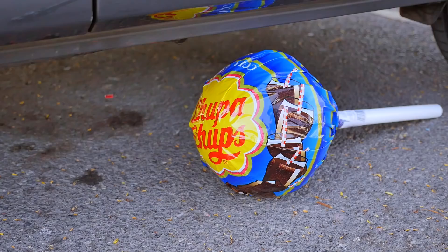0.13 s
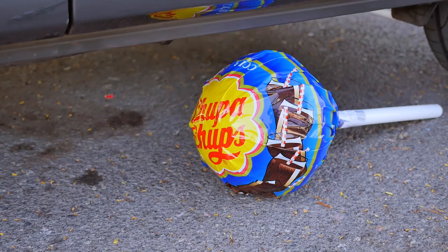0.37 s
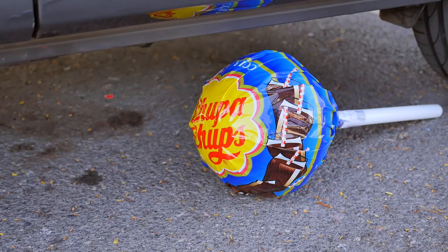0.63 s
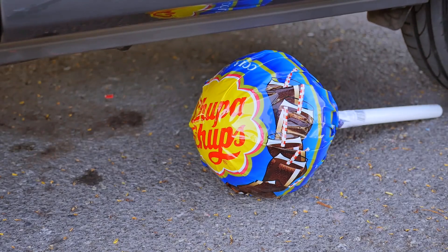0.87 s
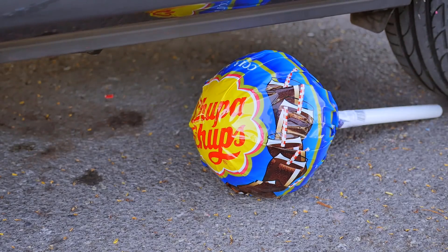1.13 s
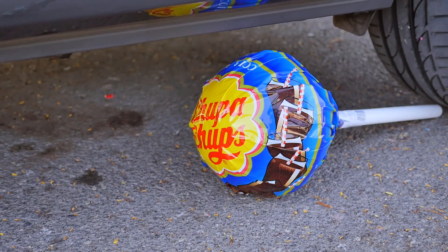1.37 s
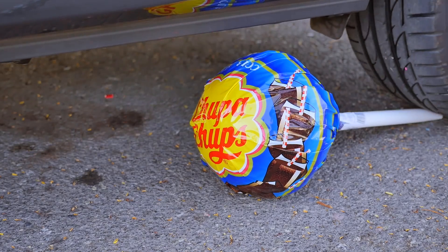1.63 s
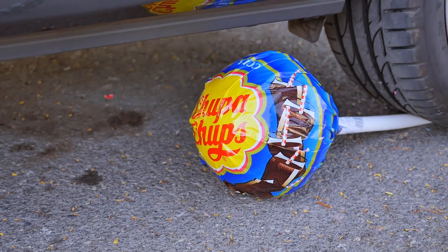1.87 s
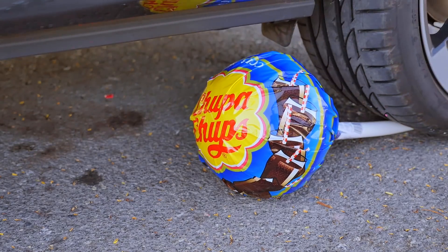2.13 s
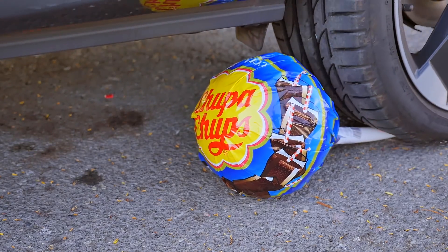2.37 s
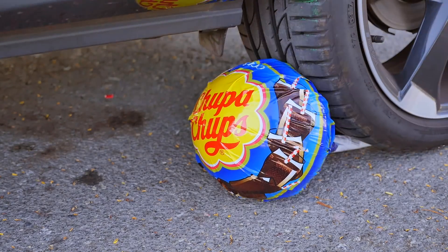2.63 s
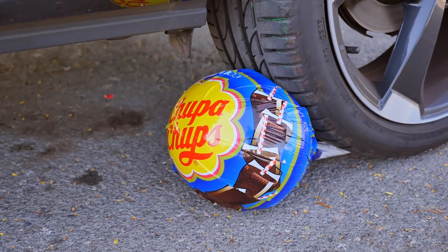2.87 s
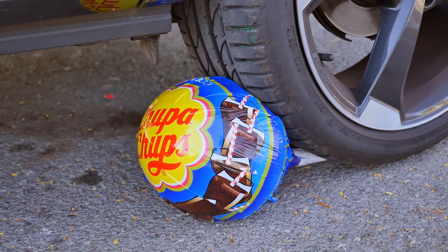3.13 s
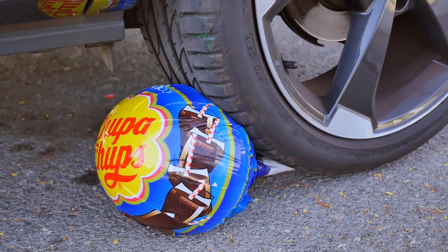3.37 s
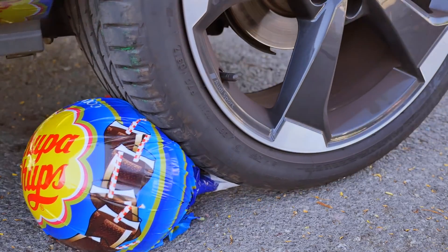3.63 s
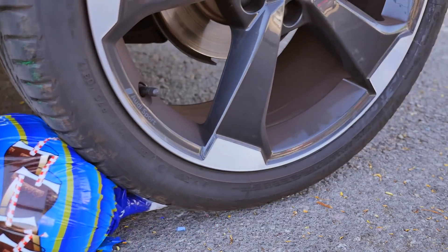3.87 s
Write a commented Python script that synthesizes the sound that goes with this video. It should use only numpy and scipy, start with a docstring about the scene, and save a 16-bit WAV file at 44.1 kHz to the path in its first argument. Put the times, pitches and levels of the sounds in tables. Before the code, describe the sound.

Wrapped plastic shell crackling under a car wheel on a road, heard very close and dry outdoors; a quiet engine idle leads, then rustling film, gritty scraping, hollow knocks and two very loud snaps.

```python
"""A big hollow plastic ball in a film wrapper is pinned to the road by a car's tyre, heard close by, outdoors.
The shell cracks in noise bursts, thuds in single pushes and scrapes as grit knocks on its resonances.
The wrapper crinkles and ticks in short puffs of noise. Behind it the car idles: noise, ringing cavities
and a high tick at each firing, after a brief opening of quiet street noise. The microphone overloads."""
import sys
import numpy as np
from scipy import signal
from scipy.fft import rfft, irfft
from scipy.io import wavfile

SR = 44100
rng = np.random.default_rng(int(sys.argv[2]) if len(sys.argv) > 2 else 0)


def boost_factor(decibels):
    """Convert a level in decibels to a linear amplitude factor."""
    exponent = np.asarray(decibels, float) / 20
    return 10 ** exponent


def pcm_store(signal):
    """Save signal as 16-bit PCM."""
    levels = np.round(np.clip(np.atleast_2d(signal), -1, 1) * 32767)
    wavfile.write(sys.argv[1], SR, levels.astype(np.int16).T)


N = 176400  # samples, 4 s


def evened(x):
    """Scales to rms 1."""
    return x / np.sqrt(np.mean(x ** 2) + 1e-20)


def curve(rows, col=1):
    """Reads a column of a time table at every sample."""
    rows = np.array(rows)
    return np.interp(np.arange(N) / SR, rows[:, 0], rows[:, col])


def after_start(rows):
    """Is true once the first time in a table has passed."""
    return np.arange(N) > rows[0][0] * SR


def colour(x, points):
    """Filters x by a spectrum drawn on a log-frequency axis."""
    f, db = np.transpose(points)
    hz = np.fft.rfftfreq(len(x), 1 / SR)
    gain_db = np.interp(np.log(hz + 1), np.log(f + 1), db)
    return irfft(rfft(x) * boost_factor(gain_db), len(x))


def resonate(x, hz, width):
    """A resonance of gain about 1 at its centre; width in Hz."""
    r = np.exp(-np.pi * width / SR)
    return 2 * signal.lfilter([1 - r], [1, -r * np.exp(2j * np.pi * hz / SR)], x).real


def ring(x, hz, t60):
    """A resonance that dies by 60 dB in t60 seconds."""
    return resonate(x, hz, np.log(1000) / np.pi / t60)


def band(x, lo_hz, hi_hz):
    """Causal band-pass."""
    return signal.sosfilt(signal.butter(2, [lo_hz, min(hi_hz, 20000)], "bandpass", fs=SR, output="sos"), x)


def highpass(x, order, hz):
    """Second-order sections of a high-pass are run both ways, so peaks keep their time."""
    return signal.sosfiltfilt(signal.butter(order, hz, "highpass", fs=SR, output="sos"), x)


def clicks(per_s, spread_db):
    """Random impulses of either sign, a few of them large."""
    size = boost_factor(spread_db * np.minimum(rng.exponential(1, N), 5)) * rng.choice([-1., 1.], N)
    return size * (rng.random(N) < per_s / SR)


def add(mix, s, sound):
    """Mixes a sound in at time s."""
    part = mix[round(s * SR):][:len(sound)]
    part += sound[:len(part)]


# Cracks of the shell. Each row: start in seconds, peak of the snap in dB, then treble and body in dB above
# the snap, burst length in seconds, ring of the wall in dB above the snap, centre of the snap in Hz.
CRACK_EVENTS = [(2.827, -21, -11, -2.5, 0.0006, -27, 2570), (3.251, -20, -13, -6, 0.0011, -17, 2200),
                (3.3982, 5, 0.5, -9.5, 0.0014, -16, 2690), (3.4324, -12, 0, -43, 0.0037, -5, 2870),
                (3.531, -22.5, -14.5, -12, 0.0014, 0, 2800), (3.548, -24.5, -8, -15, 0.0057, -13, 2800),
                (3.622, -21.5, -4, -21, 0.0014, -18, 2500), (3.739, -0.5, 6.5, -11, 0.0017, -13.5, 2360)]
# Wall of the cracking shell. Each row: resonance in Hz, level in dB, time to fall 60 dB in seconds.
CRACK_WALL_MODES = [(960, -23, 0.036), (2500, 9, 0.051), (2800, 15, 0.029), (3027, 21, 0.062),
                    (3255, 18.5, 0.065), (3360, 5, 0.078)]


def cracks():
    """A burst of fracture snaps and shakes the wall modes; splinters hiss above, the body bumps below."""
    tail_db, tail_t60_s = -12.5, 0.05
    splinter_tail_db = 2.5  # the splinters' tail is this much louder than the snap's
    thump_db, thump_s = -8, 0.00025  # dB above the body; width of the push
    t = np.arange(5000) / SR
    tail = tail_db - 60 * t / tail_t60_s
    # one-sided push of air as the shell gives
    thump = np.exp(-(t / thump_s - 2) ** 2)
    out = np.zeros(N)
    for s, db, treble_db, body_db, length_s, ring_db, snap_hz in CRACK_EVENTS:
        noise = rng.standard_normal((2, 5000))
        onset = np.exp(-(t / length_s) ** 2)
        fracture = noise[0] * (onset + boost_factor(tail))
        splinters = noise[1] * (onset + boost_factor(tail + splinter_tail_db))
        snap = band(band(fracture, 0.73 * snap_hz, 1.197 * snap_hz), 0.7 * snap_hz, 1.64 * snap_hz)
        # neighbouring modes ring in opposite sign
        wall = sum(boost_factor(d) * ring(fracture, hz, t60) * (-1) ** k
                   for k, (hz, d, t60) in enumerate(CRACK_WALL_MODES))
        treble = band(band(splinters, 3650, 10650), 2840, 16000)
        body = band(splinters, 696, 1320)
        parts = [(snap, 0), (wall, ring_db), (treble, treble_db), (body, body_db),
                 (thump, body_db + thump_db)]
        add(out, s, boost_factor(db) * sum(boost_factor(d) * p / abs(p).max() for p, d in parts))
    return out


# Dull thuds of the shell denting. Each row: time of the peak in seconds, level of the push in dB,
# pitch of the push in Hz, level of the ring in dB above the push.
DENTS = [(2.651, -30.5, 547, 2), (2.7362, -16, 380, -2.5), (2.777, -3, 893, -2.5), (2.828, -23, 870, -9),
         (2.844, -28, 800, 3), (2.9011, -22.5, 890, 2), (2.908, -17.5, 940, -3), (2.927, -26, 600, 0),
         (3.021, -22.5, 740, -2), (3.111, -32, 690, -1), (3.225, -29, 380, -7), (3.298, -23, 726, -4.5),
         (3.559, -26.5, 940, -7), (3.977, -18.5, 600, -4)]
# Ring of the dented shell. Each row: resonance in Hz, level in dB, time to fall 60 dB in seconds.
DENT_MODES = [(346, -4.5, 0.018), (785, -9, 0.027)]


def thuds():
    """Each dent is one push with dips either side; the hollow shell rings on after it."""
    lead = 200  # samples ahead of the peak
    t = np.arange(-lead, 2500) / SR
    out = np.zeros(N)
    for s, db, hz, ring_db in DENTS:
        u = (np.pi * hz * t) ** 2
        push = (1 - 2 * u) * np.exp(-u)
        rings = [ring(push + 1e-12, f, t60) for f, _, t60 in DENT_MODES]
        loudest = max(abs(r).max() for r in rings)
        after = sum(boost_factor(d + ring_db) * r / loudest for (_, d, _), r in zip(DENT_MODES, rings))
        add(out, s - lead / SR, boost_factor(db) * (push + after))
    return highpass(out + 1e-12, 2, 160)


# Shell dragged on asphalt. Each row: time in seconds, level of the hollow drone in dB,
# upper wall resonances in dB above the drone.
SCRAPE_LEVELS = [(2.615, -69, -1), (2.64, -46.5, 1.5), (2.72, -44, 2), (2.8, -36, -7), (2.835, -31, -3),
                 (2.86, -37, -2.5), (2.89, -44, -2), (2.91, -29.5, -5.5), (2.97, -39.5, -10),
                 (3.03, -39, -0.5), (3.08, -42.5, -5), (3.125, -32.5, -4.5), (3.185, -43.5, -10),
                 (3.21, -34.5, -7), (3.3, -34.5, -5.5), (3.39, -40.5, -2), (3.41, -53.5, 21),
                 (3.47, -45, -1), (3.54, -42, -2), (3.61, -34, -1), (3.67, -29.5, -6), (3.69, -29, 3),
                 (3.735, -33.5, -2.5), (3.775, -43, 3.5), (3.88, -34, -4.5), (3.94, -29, -4),
                 (4, -30.5, 0.5)]
# Hollow of the ball. Each row: resonance in Hz, width in Hz, level in dB.
HOLLOW_MODES = [(314, 410, -5.5), (663, 144, 5.5), (800, 273, 3), (1320, 1110, -7)]
# Upper wall resonances. Each row: resonance in Hz, width in Hz, level in dB.
WALL_MODES = [(1930, 380, 2.5), (2200, 58, 11.5), (2500, 250, 6.5), (2850, 250, 7), (3170, 560, 1)]


def knocked(modes):
    """Random knocks of grit set a group of resonances ringing, neighbours in opposite sign."""
    grit = clicks(per_s=1700, spread_db=3)
    return evened(sum(boost_factor(db) * resonate(grit, hz, w) * (-1) ** k for k, (hz, w, db) in enumerate(modes)))


def scrape():
    """Road grit knocks the hollow shell: a low drone and the ring of its wall."""
    drone = evened(band(band(knocked(HOLLOW_MODES), 172, 3400), 160, 4200))
    wall = evened(band(knocked(WALL_MODES), 1320, 8800))
    both = drone + boost_factor(curve(SCRAPE_LEVELS, 2)) * wall
    return boost_factor(curve(SCRAPE_LEVELS)) * both * after_start(SCRAPE_LEVELS)


# Crinkle of the wrapper. Each row: time in seconds, level in dB.
CRINKLE_LEVEL = [(2.621, -36.5), (2.66, -33), (2.74, -31.5), (2.775, -35.5), (2.8, -34), (2.88, -35.5),
                 (2.91, -30.5), (2.96, -31.5), (3.02, -35), (3.12, -33.5), (3.23, -33.5), (3.39, -34),
                 (3.41, -31), (3.46, -46), (3.58, -37.5), (3.63, -34.5), (3.7, -30.5), (3.735, -31.5),
                 (3.77, -45), (3.88, -38.5), (3.96, -36), (4, -34)]
# Colour of the film. Each row: frequency in Hz, spectrum level in dB per Hz.
FILM_COLOUR = [(880, -13), (1500, 1.5), (2270, 0.5), (3590, -2), (4780, 2.5), (5770, 0), (6430, -0.5),
               (12100, -3), (16000, -13)]


def crinkle():
    """Dense creases snap in the film, each a sharp start and a short puff of noise."""
    # the film first bunches up in a dense rush
    dense_until_s, dense_per_s, creases_per_s = 2.8, 6000, 2100
    film_t60_s, snap_db, snap_s = 0.02, 1.5, 0.00035  # snap level is above the puff
    clump_db, clump_s = 2, 0.014  # creases swell and thin in clumps
    t = np.arange(3000) / SR
    rate = np.where(np.arange(N) < dense_until_s * SR, dense_per_s, creases_per_s)
    fade = boost_factor(-60 * t / film_t60_s) + boost_factor(snap_db) * np.exp(-t / snap_s)
    creases = np.zeros(N)
    for _ in range(16):  # sixteen different puffs share the creases
        puff = fade * rng.standard_normal(3000)
        creases += signal.oaconvolve(clicks(rate / 16, spread_db=3), puff)[:N]
    clumps = evened(resonate(rng.standard_normal(N), 0, 1 / (np.pi * clump_s)))
    film = evened(colour(creases * boost_factor(clump_db * clumps), FILM_COLOUR))
    return film * boost_factor(curve(CRINKLE_LEVEL)) * after_start(CRINKLE_LEVEL)


# Single ticks of film and grit. Each row: start in seconds, peak in dB, tilt towards the treble in dB.
TICK_EVENTS = [(1.689, -45, 0), (1.866, -36, -1), (1.969, -50, -9), (2.067, -39, 8), (2.091, -42, 6),
               (2.1993, -39, -3), (2.5465, -31, -1.5), (2.6327, -24, -5), (2.7602, -17, -2),
               (2.9037, -19, 9), (2.991, -17, -7), (3.0027, -15, -4), (3.0205, -15, -7), (3.0251, -15, 3),
               (3.0555, -22, -10), (3.0745, -17.5, -8), (3.097, -19.5, 5), (3.151, -20, 4),
               (3.1777, -21, -1), (3.195, -15.5, -3), (3.2324, -15, -4), (3.2429, -15.5, 5), (3.27, -17, 3),
               (3.2971, -17, -1), (3.3533, -19.5, 6), (3.482, -21, 5.5), (3.5033, -25, 2),
               (3.5941, -8, 9.5), (3.6277, -7.5, 2.5), (3.6523, -17, 6), (3.708, -15, 2), (3.8262, -26, -9),
               (3.902, -21.5, -12), (3.9762, -13, -8.5)]


def ticks():
    """Film or grit gives suddenly: one impulse, a very short puff of noise and a weaker tail."""
    t60_s, tail_db, tail_t60_s = 0.0015, -8.5, 0.026
    t = np.arange(3000) / SR
    fade = boost_factor(-60 * t / t60_s) + boost_factor(tail_db - 60 * t / tail_t60_s)
    out = np.zeros(N)
    for s, db, tilt_db in TICK_EVENTS:
        puff = rng.standard_normal(3000) * fade
        puff[0] = 4.3 * np.sign(puff[0])  # the sudden give
        lower = band(band(puff, 4320, 8440), 3700, 8600)
        tick = lower + boost_factor(tilt_db) * band(puff, 6460, 12600)
        add(out, s, boost_factor(db) * tick / abs(tick).max())
    return out


# Idling car. Each row: time in seconds, level in dB.
IDLE_LEVEL = [(0, -55), (2.2, -55), (2.35, -48.5), (2.5, -45), (2.62, -45), (3.4, -41.5), (3.46, -55.5),
              (4, -45)]
# Broad noise of the idle. Each row: frequency in Hz, spectrum level in dB per Hz.
IDLE_SPECTRUM = [(15, -49), (25, -6.5), (145, -4), (476, -3), (591, -3), (840, -8), (1370, -8.5),
                 (1560, -8.5), (2350, -8.5), (6400, -16.5), (7100, -49), (12200, -40), (14400, -41),
                 (15400, -35)]
# Cavities of engine bay and body. Each row: resonance in Hz, width in Hz, level in dB.
BAY_MODES = [(600, 11, 11.5), (726, 68, 0.5), (914, 73, -3), (1371, 100, 2), (1674, 76, 1.5),
             (2060, 240, -2), (2490, 135, -2), (2907, 126, 0), (3160, 70, -4), (3800, 65, -3.5),
             (4840, 85, -7.5), (6340, 300, -15)]
# Injector tick. Each row: resonance in Hz, width of each of its two passes in Hz, level in dB.
INJECTOR_MODES = [(8100, 330, 1), (10200, 230, 1.5), (11660, 520, 1.5), (11910, 350, 2.5), (12400, 290, 1),
                  (13100, 500, -4)]


def engine():
    """Steady broad noise, a low cavity throbbing once a cycle, wavering upper ones; a tick each firing."""
    firings_per_s, firing_s = 36, 0.013  # rate; time of a firing
    cycle_s, throb_sharpness = 0.031, 0.98  # one strong moment in each cycle of four firings
    bay_db, waver_db = 1, 3
    injector_db, spread_db, sharpness = -12.5, 3, 2.3
    t = np.arange(N) / SR
    turns = firings_per_s * (t - firing_s)
    noise = evened(colour(rng.standard_normal(N), IDLE_SPECTRUM))
    throb = evened(np.exp(throb_sharpness * np.cos(2 * np.pi * firings_per_s / 4 * (t - cycle_s))))
    drive = rng.standard_normal((2, N))
    bay = np.zeros(N)
    for hz, width, db in BAY_MODES:
        if hz < 700:
            swell = throb
        else:  # each of these swells and fades by itself
            swell = boost_factor(waver_db * np.interp(t, np.linspace(0, 4, 14), rng.standard_normal(14)))
        bay += boost_factor(db) * resonate(drive[0], hz, width) * swell
    pulses = drive[1] * np.exp(-sharpness * (turns % 1))
    firing = np.floor(turns).astype(int)
    injector = np.zeros(N)
    for hz, width, db in INJECTOR_MODES:
        strength = boost_factor(spread_db * rng.standard_normal(200))[firing]  # differs from firing to firing
        injector += boost_factor(db) * resonate(resonate(pulses * strength, hz, width), hz, width)
    idle = noise + boost_factor(bay_db) * evened(bay) + boost_factor(injector_db) * evened(injector)
    return boost_factor(curve(IDLE_LEVEL)) * evened(idle)


# Quiet street. Each row: frequency in Hz, spectrum level in dB per Hz.
STREET_COLOUR = [(15, -49), (25, -21), (87, -6.5), (175, -10.5), (754, -9.5), (936, -13.5), (2050, -11),
                 (3430, -17.5), (14000, -32), (16000, -38)]


def street():
    """Quiet street noise is steady and coloured."""
    return boost_factor(-59.5) * evened(colour(rng.standard_normal(N), STREET_COLOUR))


def scene():
    """All sources, close and outdoors; quiet street noise plays alone until 0.21 s, when the background
    switches abruptly to the idling car."""
    quiet_until_s = 0.212
    background = np.where(np.arange(N) < quiet_until_s * SR, street(), engine())
    return (cracks() + thuds() + scrape() + crinkle() + ticks() + background)[None]


def roll_off(x):
    """The treble ends steeply here."""
    return signal.sosfilt(signal.butter(12, 16460, fs=SR, output="sos"), x)


def record(dry):
    """Band limits of the microphone; the loudest peaks hit its ceiling."""
    low_hz, edge_hz, ceiling = 60, 15780, 0.99  # ceiling as a part of full scale
    heard = signal.sosfilt(signal.butter(1, low_hz, "highpass", fs=SR, output="sos"), dry)
    treble_limit = signal.firwin(1023, edge_hz, window=("kaiser", 8), fs=SR)
    heard = signal.oaconvolve(heard, treble_limit[None], "same")
    mix = np.clip(heard, -ceiling, ceiling)
    return roll_off(mix)


dry = scene()
out = record(dry)
pcm_store(out)
```